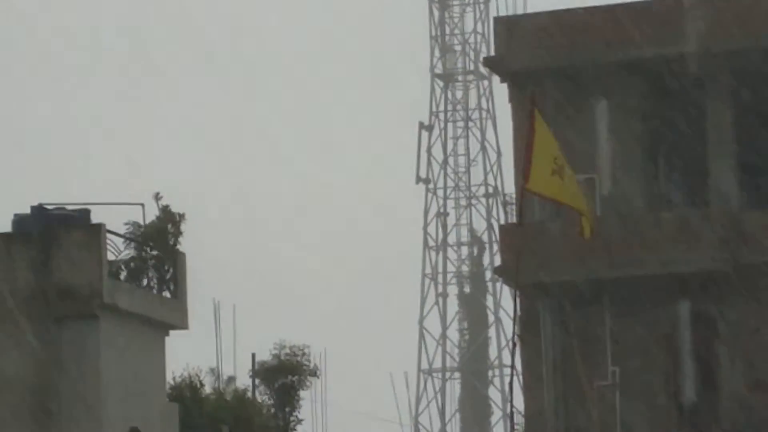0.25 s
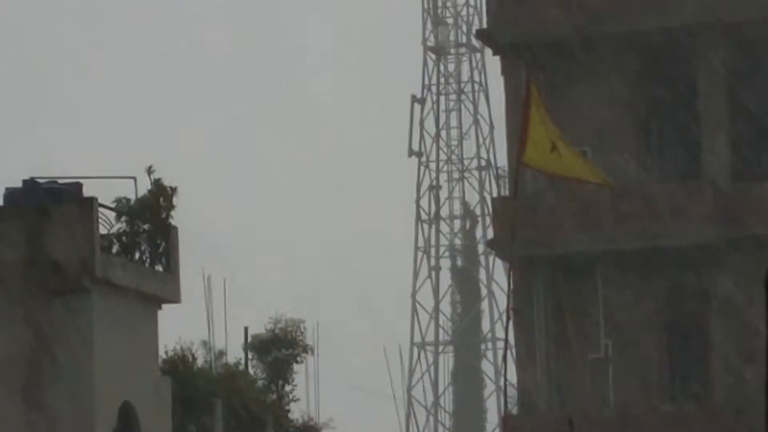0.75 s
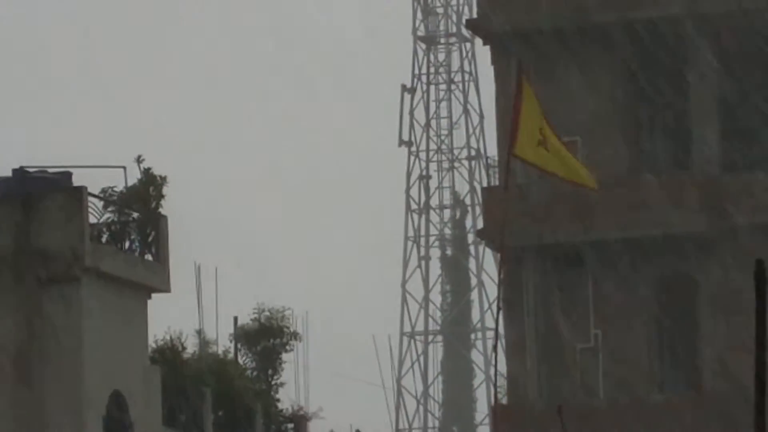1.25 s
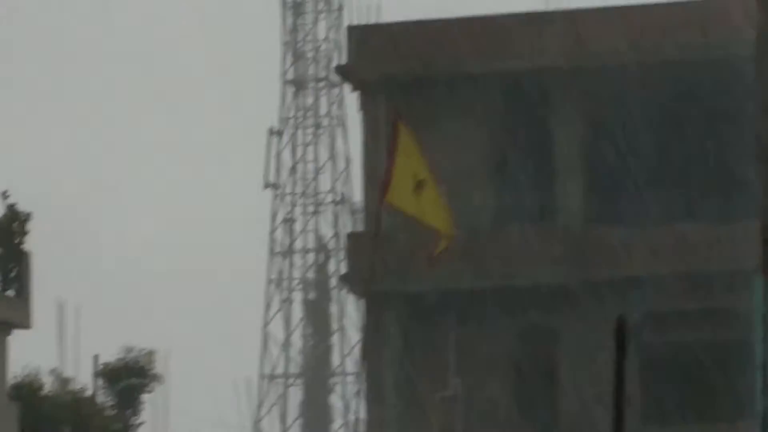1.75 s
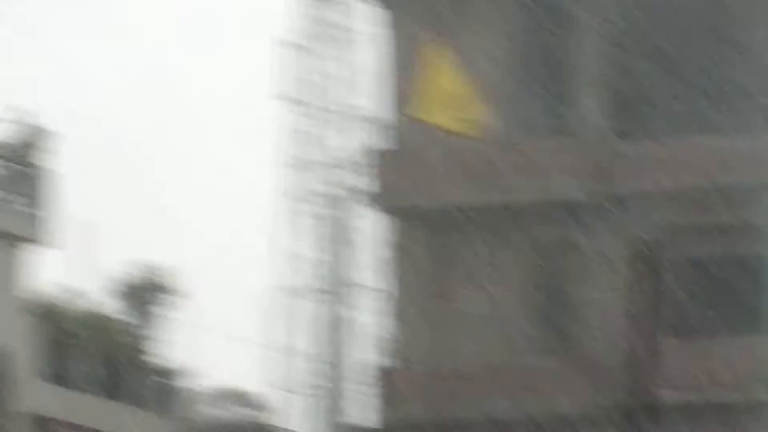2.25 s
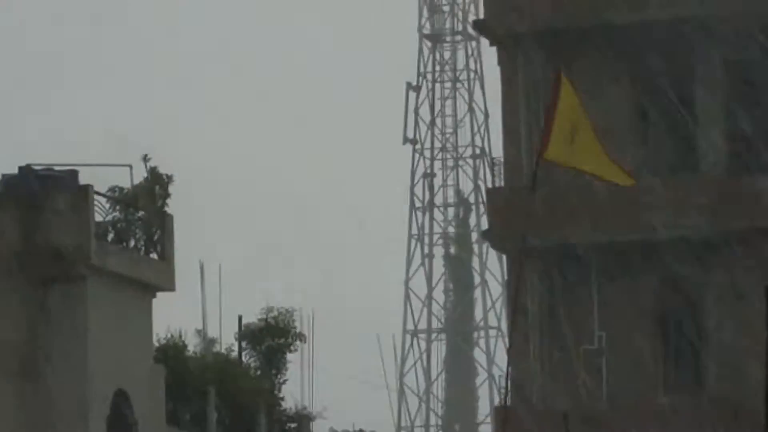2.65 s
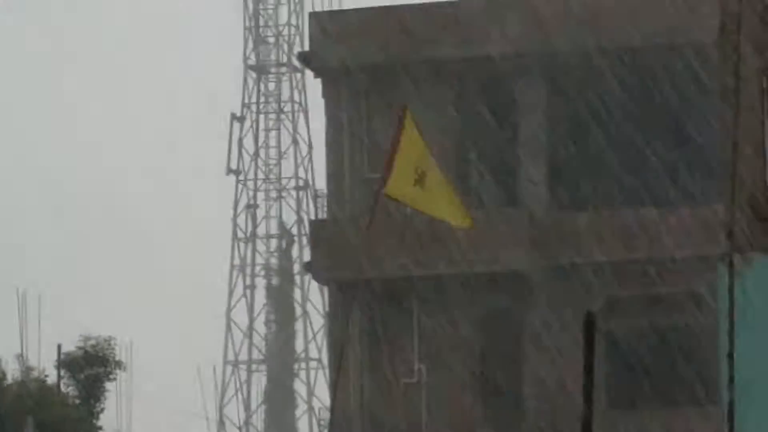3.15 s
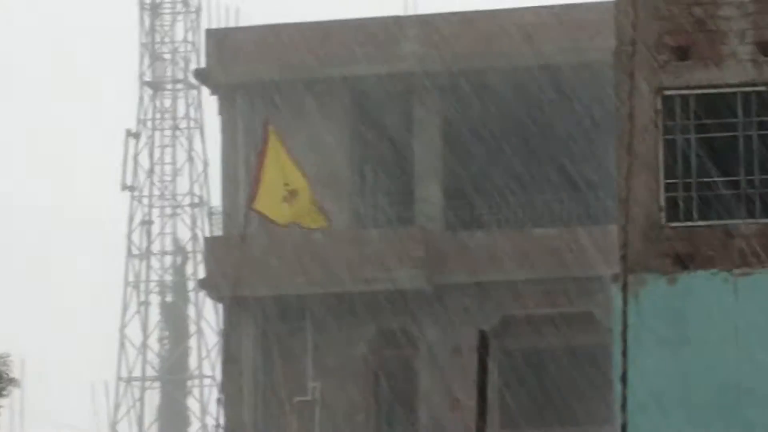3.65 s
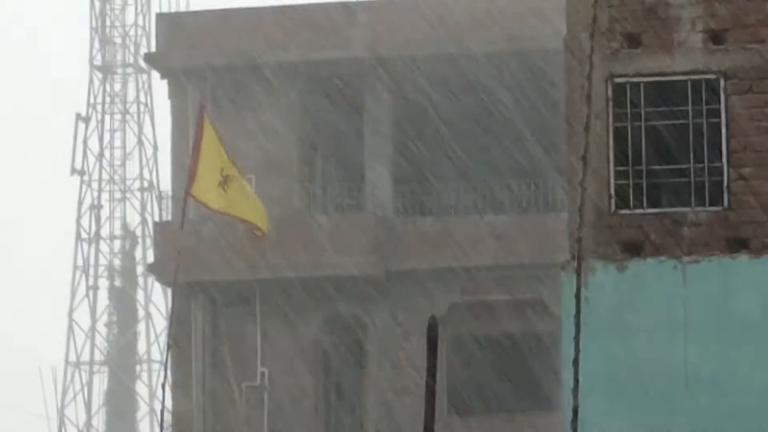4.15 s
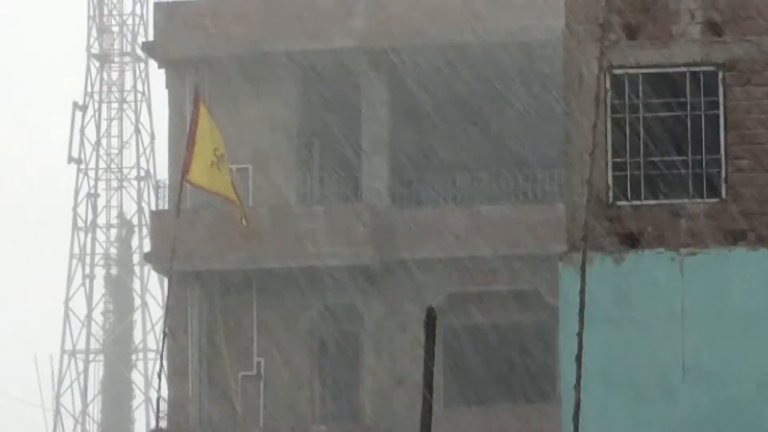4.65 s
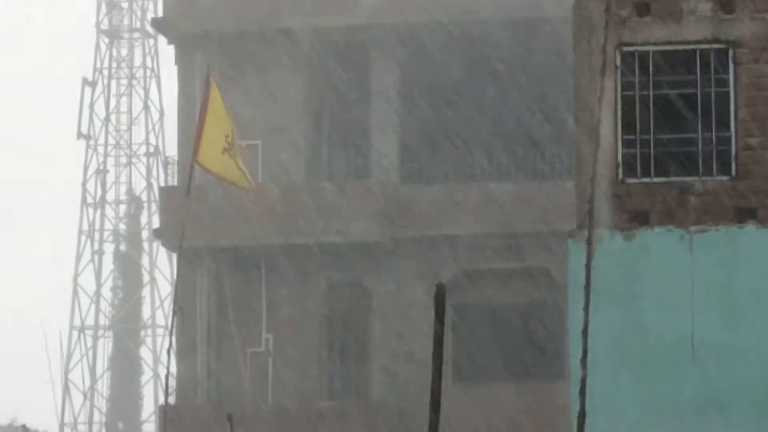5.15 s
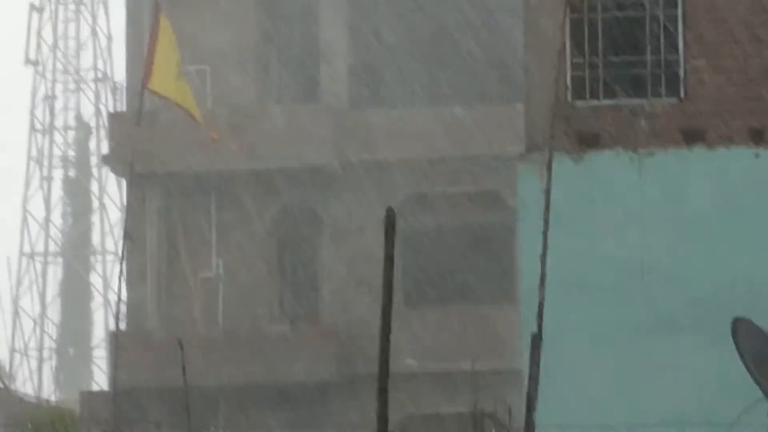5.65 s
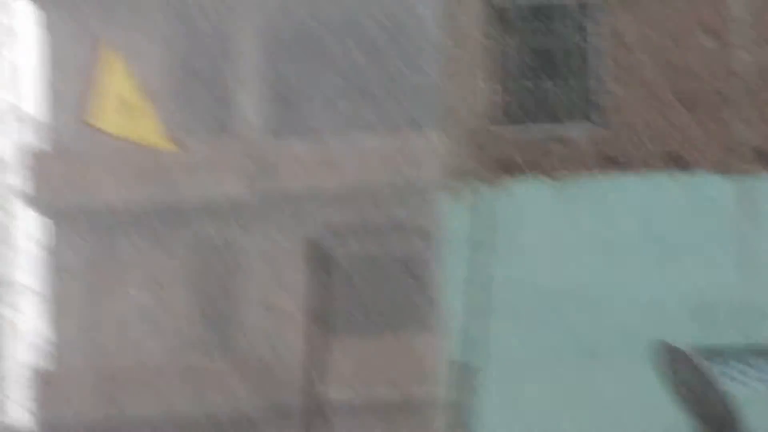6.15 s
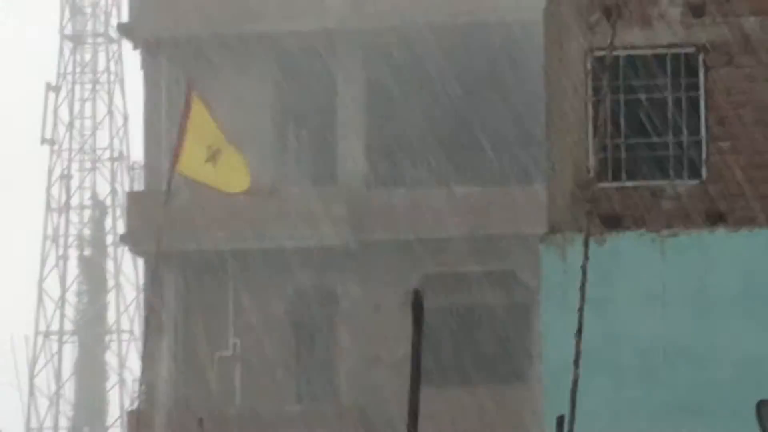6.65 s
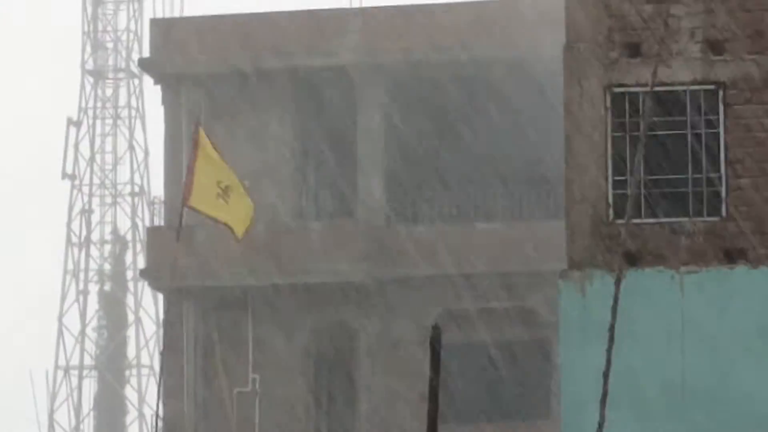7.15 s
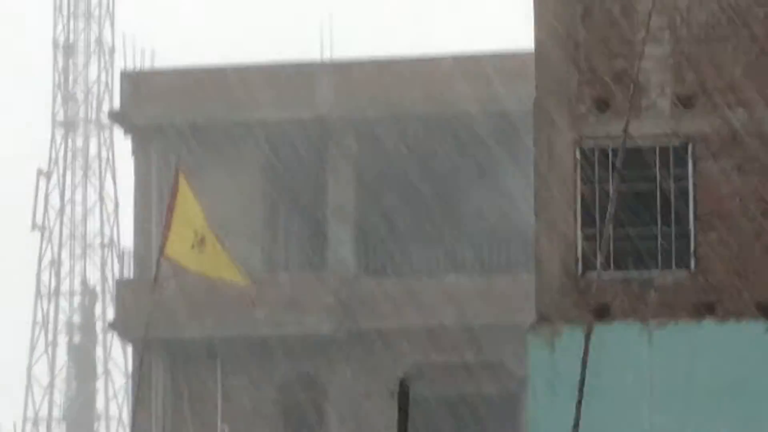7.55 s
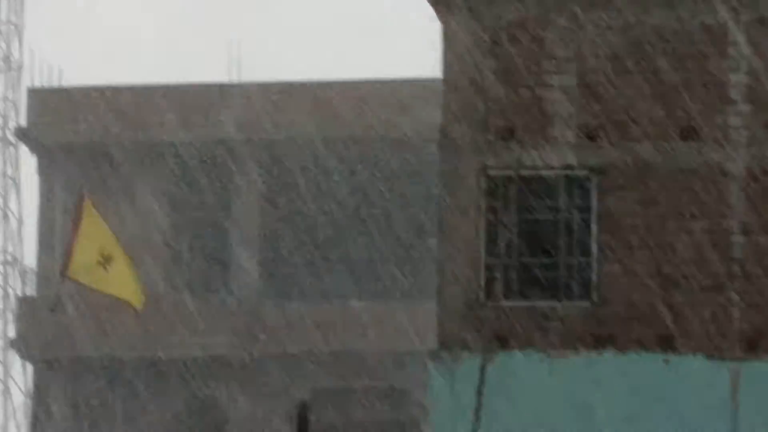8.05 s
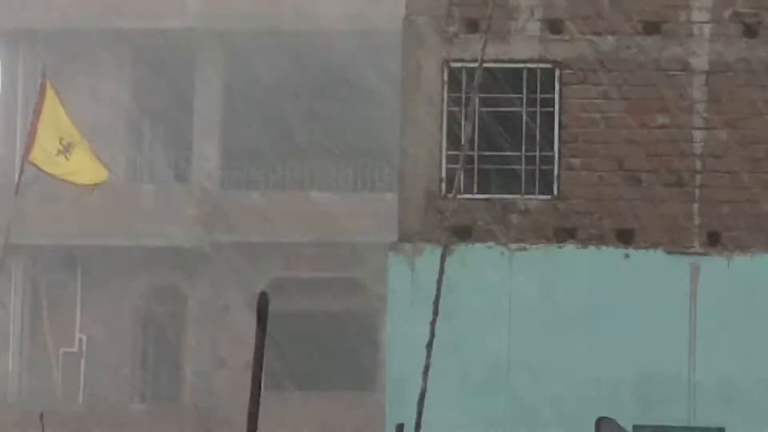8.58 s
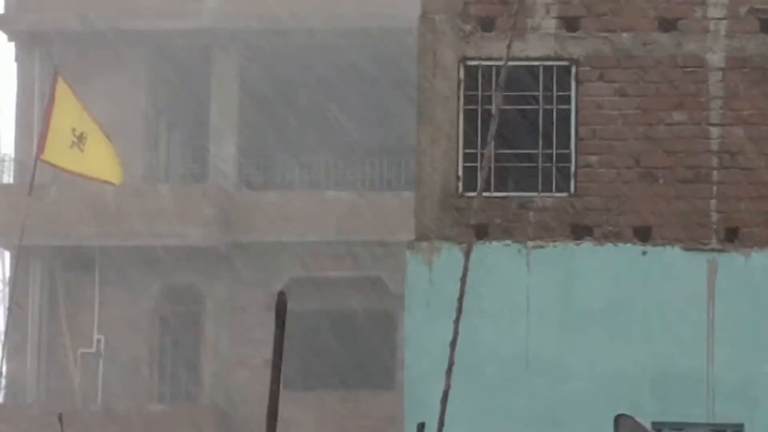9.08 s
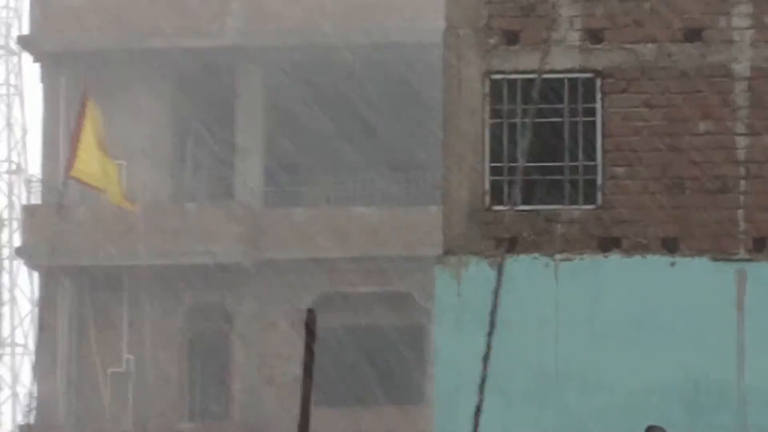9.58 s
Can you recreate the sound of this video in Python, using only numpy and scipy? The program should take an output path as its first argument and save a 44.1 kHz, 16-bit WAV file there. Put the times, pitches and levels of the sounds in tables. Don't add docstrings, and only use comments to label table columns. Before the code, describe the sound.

Outdoors among rooftops, a small handheld microphone catches heavy rain at close range. Crisp, ringing drops crackle in irregular clusters over fine hissing spray and a dull distant wash. Wind gusts bring low rumble, flutter and soft thumps, strongest around two and a half seconds. After about six seconds the wind fades and the near patter becomes quieter but continues to the end.

```python
import sys
import numpy as np
from scipy import signal
from scipy.io import wavfile
from scipy.ndimage import uniform_filter1d

SR = 44100
rng = np.random.default_rng(int(sys.argv[2]) if len(sys.argv) > 2 else 0)


def persist_wave(psi):
    counts = np.round(np.clip(psi, -1, 1) * 32767).astype(np.int16)
    wavfile.write(sys.argv[1], SR, np.atleast_2d(counts).T)


def gain_from_decibels(decibels):
    exponent = np.asarray(decibels, float) / 20
    return 10 ** exponent


N = 433062

# time in seconds, level in dB, dull splash of heavier water in dB re the level.
NEAR_RAIN = [(0.0, -23, -9), (0.08, -18.5, -16), (0.19, -21, -9.5), (0.57, -21.5, -16), (0.6, -20, -17),
             (0.9, -23, -8.5), (1.67, -22, -12), (2.68, -26, -14.5), (3.14, -23.5, -10.5), (3.2, -22, -15),
             (3.25, -24.5, -10), (3.99, -23.5, -16.5), (5.8, -31, -9), (6.7, -31.5, -12), (7.03, -29, -7.5),
             (8.72, -27, -10), (9.33, -30, -10), (9.82, -31, -10)]
# frequency in Hz, gain in dB per Hz.
PORT_RESPONSE = [(1900, -61.5), (3200, -42.5), (4050, -26), (5050, -19.5), (6000, -8), (6600, -3.5),
                 (7080, 1), (7440, 3.5), (7700, 2.5), (8000, -11), (8300, -16.5), (8500, -33.5),
                 (8700, -60), (9000, -72), (11600, -95.5)]


def evened(x):
    return x / np.sqrt(np.mean(x ** 2) + 1e-20)


def read(points, hz):
    f, value = np.transpose(points)
    return np.interp(np.log(hz + 1), np.log(f + 1), value)


def curve(rows, t, order=1):
    rows = np.array(rows)
    return np.interp(t, rows[:, 0], rows[:, order])


def add(mix, start_s, sound):
    part = mix[max(round(start_s * SR), 0):][:len(sound)]
    part += sound[:len(part)]


def causal(points, lag=.5, size=4096):
    gain_db = np.maximum(read(points, abs(np.fft.fftfreq(size, 1 / SR))), -100)
    log_gain = np.log(gain_from_decibels(gain_db))
    phase = lag * signal.hilbert(log_gain).imag
    response = np.fft.ifft(np.exp(log_gain - 1j * phase)).real
    return np.roll(response, size // 2 - np.argmax(abs(response)))


def drift(per_s):
    knots = rng.standard_normal(4000)
    return evened(np.interp(np.arange(N) * per_s / SR, np.arange(4000), knots))


def bell(t, middle_s, length_s):
    out = np.zeros(len(t))
    first, last = int((middle_s - 2 * length_s) * SR), int((middle_s + 2 * length_s) * SR)
    span = slice(max(first, 0), last)
    out[span] = np.exp(-(2 * (t[span] - middle_s) / length_s) ** 2)
    return out


def burst(hz, width_s):
    half = int(3 * width_s * SR)
    t = np.arange(-half, half + 1) / SR
    return np.cos(2 * np.pi * hz * t) * np.exp(-(t / width_s) ** 2)


def shower(t):
    return curve(NEAR_RAIN, t)


def handfuls(t):
    # middle in seconds, swell in dB, length in seconds, dull splash in dB re the swell.
    throws = [(0.01, 5.5, 0.026, 1), (0.808, 1, 0.063, 4), (0.94, 3.5, 0.032, -0.6), (1.097, -1, 0.049, 3),
              (1.564, 2, 0.13, -2.5), (1.79, 3.4, 0.23, 3), (2.205, -1, 0.095, 4.5), (2.444, 4.5, 0.06, -4),
              (3.143, 3, 0.068, -1), (3.468, 0.5, 0.14, -1), (4.06, 2.5, 0.07, -4), (4.41, 4.5, 0.15, -6.5),
              (4.937, 4, 0.028, 1), (5.05, 0, 0.08, -1), (5.155, 4.5, 0.04, -5), (5.26, 2, 0.035, -2),
              (5.52, 2, 0.13, 2.9), (5.894, 2.5, 0.048, 4), (6.74, 4.5, 0.035, 0.9), (6.813, 4, 0.05, 2),
              (7.225, 0.5, 0.046, 3), (7.577, 3, 0.024, 2), (7.72, -1, 0.041, 0.3), (8.11, 4.0, 0.07, -5),
              (8.216, 0, 0.05, 2), (8.565, 1, 0.049, 5), (8.87, 1, 0.065, 2), (9.002, 2, 0.11, 0.2),
              (9.27, 3, 0.05, -1.5), (9.8, 1.5, 0.02, -1)]
    # middle in seconds, swell in dB.
    spills = [
        (.22, 2),
        (.63, 0.5),
        (2.76, 1),
        (3.56, 2),
        (4.23, 4),
        (6.4, 7),
        (7.11, 6.5),
        (8.09, 7),
    ]
    spill_s = 0.061
    whole_db = -0.1 * drift(per_s=18)
    whole_db = whole_db + sum(db * bell(t, s, length_s) for s, db, length_s, _ in throws)
    dull_db = 1.0 * drift(per_s=9)
    dull_db = dull_db + sum(db * bell(t, s, length_s) for s, _, length_s, db in throws)
    return whole_db, dull_db + sum(db * bell(t, s, spill_s) for s, db in spills)


def patter():
    t = np.arange(N) / SR
    thrown = (rng.random(N) < 45 / SR) * rng.exponential(1, N)
    clustering = signal.lfilter([1], [1, -np.exp(-1 / (0.013 * SR))], thrown)
    density_per_s = 2200 * (.75 + .6 * clustering)
    size = gain_from_decibels(2.4 * np.minimum(rng.exponential(1, N), 3.2)) * rng.choice([-1., 1.], N)
    ticks = evened(size * (rng.random(N) < density_per_s / SR))
    kind, pitches_hz = rng.integers(0, 8, N), np.linspace(3500, 9100, 8)
    voiced = sum(signal.oaconvolve(ticks * (kind == k), burst(hz, 0.0003), "same")
                 for k, hz in enumerate(pitches_hz))
    power = signal.lfilter([1], [1, -np.exp(-1 / (0.00057 * SR))], ticks ** 2)
    scatter = np.sqrt(power) * rng.standard_normal(N)
    spray = gain_from_decibels(0.95 * drift(per_s=17)) * rng.standard_normal(N)
    x = gain_from_decibels(-8.5) * evened(voiced) + gain_from_decibels(-3.5) * evened(scatter) + gain_from_decibels(-1.5) * spray
    x = evened(signal.oaconvolve(x, causal(PORT_RESPONSE), "same"))
    swell_db, dull_db = handfuls(t)
    dull = signal.sosfiltfilt(signal.butter(2, 6100, fs=SR, output="sos"), x)
    splash_db = 0.6 * (curve(NEAR_RAIN, t, order=2) + 12.5) + dull_db
    x = x + (gain_from_decibels(splash_db) - 1) * dull
    return gain_from_decibels(-0.99 + shower(t) + swell_db) * x


def all_drops():
    # time in seconds, peak in dB, dull slap in dB re the tick.
    large = [(0.1775, -6, -17), (0.619, -6, -17), (0.6799, -6, -17), (0.9827, -7, -17), (1.288, -6, -17),
             (1.3199, -6, -17), (1.5604, -5, -17), (1.713, -8, -17), (1.7749, -5, -17), (2.138, -6, -17),
             (2.4234, -6, -17), (2.5292, -5, -17), (3.1233, -6, -17), (3.461, -6, -17), (3.5558, -6, -17),
             (3.5997, -10, -17), (3.8611, -8, -17), (3.918, -10, -17), (4.0372, -6, -17),
             (4.1071, -10, -17), (4.1814, -8, -17), (4.2298, -6, -17), (5.0389, -8, -17), (5.238, -10, -17),
             (7.2115, -13, -17), (7.5702, -11, -17), (7.7119, -10, -17), (8.0855, -10, -17),
             (8.982, -9, -17), (9.2529, -6, -17)]
    # time in seconds, peak in dB.
    more_large = [(0.0134, -8), (0.0333, -6), (0.0508, -8), (0.2084, -7), (0.2219, -5), (0.4858, -6),
                  (0.8081, -7), (0.9323, -6), (1.0804, -8), (1.0999, -6), (1.1223, -6), (1.5754, -5),
                  (1.7854, -6), (1.9044, -9), (2.1794, -8), (2.1954, -7), (2.4488, -9), (3.5054, -9),
                  (3.7449, -10), (4.3819, -10), (4.6074, -11), (4.9404, -11), (5.5154, -13), (6.7406, -13),
                  (7.7308, -11), (7.8131, -10), (8.2147, -8), (8.5574, -11), (8.7839, -10), (8.8872, -8)]
    stray_count, over_shower_db, spread_db, slap_db = 90, 11, 4.5, -18
    ring_up_s = .0012
    when, size, dull = rng.random((stray_count, 3)).T
    stray_s = when * N / SR
    stray_db = shower(stray_s) + over_shower_db - spread_db * size
    strays = np.c_[stray_s, stray_db, slap_db + 8.0 * (dull - .5)]
    more_rows = [(s, db, slap_db) for s, db in more_large]
    placed = np.vstack([large, more_rows]) + [ring_up_s, 0, 0]
    return np.vstack([placed, strays])


def drops():
    hits, slaps, t = np.zeros(N), np.zeros(N), np.arange(2600) / SR
    rows = all_drops()
    chance = rng.random((len(rows), 2, 2600))
    for (s, db, slap_db), (when, size) in zip(rows, chance):
        splash_db = -17.5 + 12 * (size[0] - .5)
        crown = 0.85 * np.exp(-t / 0.006)
        mist = gain_from_decibels(np.minimum(splash_db + 9.5, -7) - 60 * t / 0.02)
        droplets = (when < 1400 / SR) * (2 * size - 1)
        droplets = droplets * np.maximum(crown, mist) * (t > .0016)
        droplets[0] = 1
        add(hits, s, gain_from_decibels(db - .2) * droplets)
        add(slaps, s, gain_from_decibels(db + slap_db - 4.5) * droplets)
    highpass = signal.butter(2, 6800, "high", fs=SR, output="sos")
    port = signal.sosfiltfilt(highpass, causal(PORT_RESPONSE))
    ringing = signal.oaconvolve(hits, port / abs(port).max(), "same")
    return ringing + signal.oaconvolve(slaps, burst(5680, 0.00065), "same")


def gusts(t):
    # start in seconds, length in seconds, rumble in dB, flutter in dB re the rumble.
    gust_rows = [(0.366, .22, -35, -10), (.604, .108, -37, -8), (.827, .15, -38, -14), (1.0, 0.11, -42, -6),
                 (1.25, .05, -44, -9), (1.456, 0.078, -46, -4), (1.771, 0.046, -37, 2),
                 (1.865, 0.35, -39, -7), (2.206, 0.21, -34, -6), (2.49, 0.19, -32, -5),
                 (2.7, 0.071, -45, -8), (3.265, 0.083, -42, -17), (3.94, .06, -49, -4),
                 (4.068, .064, -38, -5), (4.18, .098, -36, 5), (4.307, .046, -38, -6),
                 (4.443, 0.053, -35, -10), (4.63, .034, -37, -19), (4.84, 0.22, -34.5, -9),
                 (5.108, 0.1, -48, -12), (5.37, .05, -45, -4), (5.523, 0.076, -44, -7),
                 (5.608, 0.16, -36, -1), (6.12, 0.14, -41, -11)]
    # time in seconds, rumble in dB.
    breeze_rows = [(0, -57), (.3, -57), (1, -46.5), (1.35, -56), (1.5, -50), (1.7, -51), (2.7, -50),
                   (3.1, -55), (3.7, -52.5), (4.0, -46), (4.6, -50.5), (5.2, -51.5), (5.5, -49),
                   (6.0, -50.5), (6.25, -52), (6.5, -56), (9.82, -56.5)]
    edge_s, breeze_flutter_db = .04, -6.5
    slow = t[::64]
    shape = []
    for s, length_s, *_ in gust_rows:
        to_edge_s = np.minimum(slow - s, s + length_s - slow)
        shape.append(np.clip(to_edge_s / edge_s + .5, 0, 1) ** 2)
    _, _, db, flutter_db = np.transpose(gust_rows)
    breeze = gain_from_decibels(curve(breeze_rows, slow))
    rumble = gain_from_decibels(db - 5.5) @ np.array(shape) + breeze
    flutter = gain_from_decibels(db + flutter_db - 9.5) @ np.array(shape) + gain_from_decibels(breeze_flutter_db) * breeze
    return np.interp(t, slow, rumble), np.interp(t, slow, flutter)


def blow(hz):
    turns = np.arange(-SR / hz, 4 * SR / hz) * hz / SR
    snap = min(65 / hz, 1) ** 2
    edge = sum(np.cos(2 * np.pi * k * turns + 1.2) / k for k in range(2, 7))
    swing = np.cos(2 * np.pi * turns) + 0.52 * snap * edge * np.exp(-(turns / 0.51) ** 2)
    width_turns = np.where(turns < 0, 0.069 + hz / 250, 0.19 + hz / 110)
    return swing * np.exp(-(turns / width_turns) ** 2)


def wind():
    # time in seconds, peak in dB, swing in Hz.
    blow_rows = [(0.488, -28, 40), (0.652, -29, 50), (0.693, -29, 103), (0.851, -27, 56), (1.909, -29, 49),
                 (1.937, -28, 112), (2.108, -32, 54), (2.134, -27, 65), (2.276, -22, 44), (2.324, -19, 58),
                 (2.362, -24, 34), (2.501, -31, 68), (2.528, -24, 80), (2.572, -26, 53), (2.624, -26, 52),
                 (2.65, -32, 55), (3.295, -29, 56), (4.212, -21, 140), (4.248, -30, 90), (4.327, -28, 77),
                 (4.65, -33, 43), (4.849, -31, 46), (4.872, -32, 56), (4.941, -30, 106), (4.979, -25, 113),
                 (5.028, -30, 36), (5.651, -32, 90), (5.685, -28, 73), (5.714, -25, 109), (6.178, -33, 68)]
    t, lumps = np.arange(N) / SR, gain_from_decibels(2.0 * np.clip(drift(per_s=45), -2, 1.2))
    rumble, flutter = rng.standard_normal((2, N))
    rumble = signal.sosfilt(signal.butter(2, [7, 55], "band", fs=SR, output="sos"), rumble)
    flutter = signal.sosfilt(signal.butter(2, [90, 190], "band", fs=SR, output="sos"), flutter)
    low, high = gusts(t)
    out = lumps * (low * evened(rumble) + high * evened(flutter))
    for s, db, hz in blow_rows:
        add(out, s - 1 / hz, gain_from_decibels(db - 1.5) * blow(hz))
    return out


def wash():
    # time in seconds, level in dB.
    far_rain = [(0, -40.5), (1, -41), (2, -39.5), (3, -40), (3.9, -39.5), (4.8, -39.5), (5.8, -41.5),
                (7, -41), (8.1, -40.5), (9, -40), (9.82, -40.5)]
    # frequency in Hz, level in dB per Hz.
    far_spectrum = [(15, -27), (25, -5), (121, -7.5), (172, -10.5), (306, -4), (357, -5), (456, -1.5),
                    (650, -4), (830, 1.5), (1040, -5.5), (1650, -13), (2870, -25), (3920, -13.5),
                    (5000, -11), (6500, -18.5), (11000, -120)]
    frames, hz = N // 512 + 5, np.fft.rfftfreq(2048, 1 / SR)
    a, b, patches = rng.standard_normal((frames, 1025, 3)).T
    patches = uniform_filter1d(patches, size=24, axis=0)
    patches = evened(uniform_filter1d(patches, size=6, axis=1))
    z = (a + 1j * b) * gain_from_decibels(read(far_spectrum, hz)[:, None] + 0.68 * patches)
    x = signal.istft(z, nperseg=2048, noverlap=1536)[1][:N]
    return gain_from_decibels(1.0 + curve(far_rain, np.arange(N) / SR)) * evened(x)


def scene():
    return (patter() + drops() + wind() + wash())[None]


def low_pass(x):
    return signal.sosfilt(signal.butter(12, 15900, fs=SR, output="sos"), x)


def record(dry):
    # start in seconds, depth in dB, hold in seconds.
    dips = [
        (0, 1, 0.093),
        (0.483, 3.5, 0.11),
        (0.655, 3, 0.096),
        (1.574, 3, 0.079),
        (1.789, 4, 0.098),
        (2.42, 1.5, 0.071),
        (3.136, 6, 0.083),
    ]
    click_s, click_db = 4.6733, -23.7
    t = np.arange(N) / SR
    dip_db = sum(db * ((t > s) & (t < s + hold_s)) for s, db, hold_s in dips)
    x = dry / gain_from_decibels(uniform_filter1d(dip_db, size=1300))
    edge = signal.firwin(401, 8620, window=("kaiser", 9), fs=SR)
    x = signal.oaconvolve(0.57 * np.tanh(x / 0.53), edge[None], "same")
    x = x - 0.028 * np.exp(-t / 0.51)
    x = x + gain_from_decibels(click_db) * (np.arange(N) == round(click_s * SR))
    return low_pass(x)


dry = scene()
out = record(dry)
persist_wave(out)
```